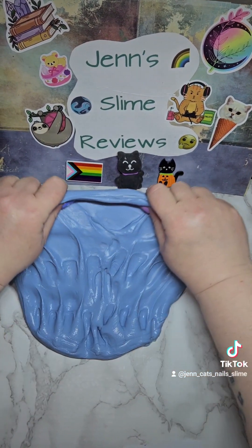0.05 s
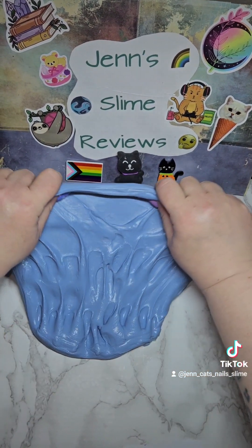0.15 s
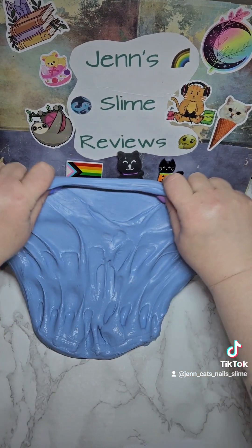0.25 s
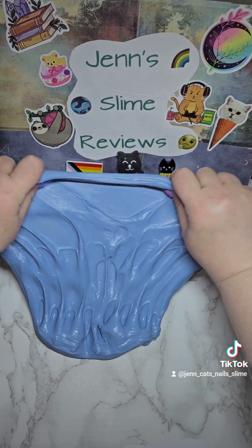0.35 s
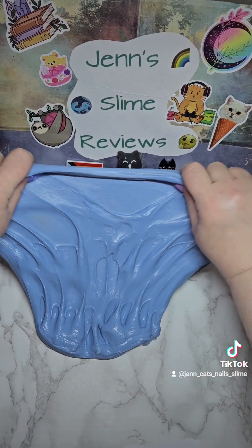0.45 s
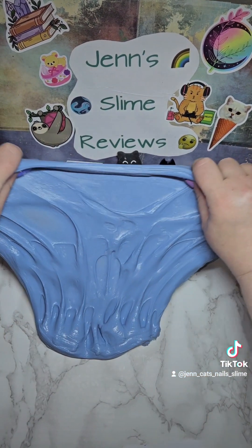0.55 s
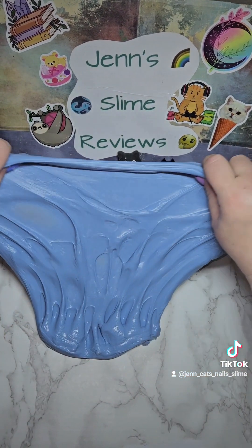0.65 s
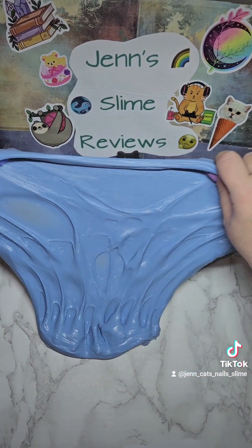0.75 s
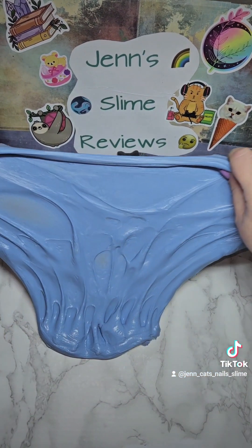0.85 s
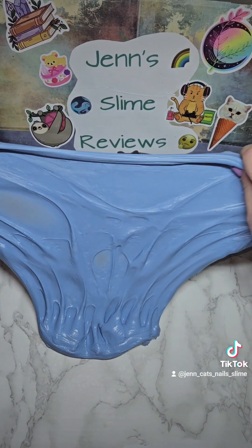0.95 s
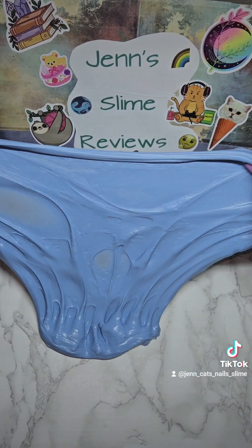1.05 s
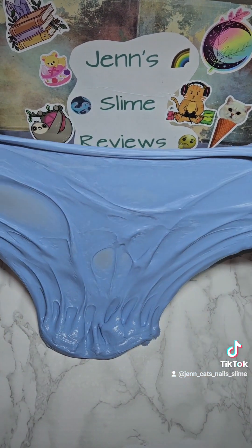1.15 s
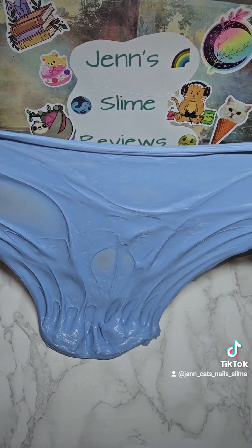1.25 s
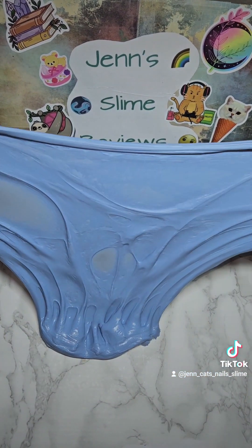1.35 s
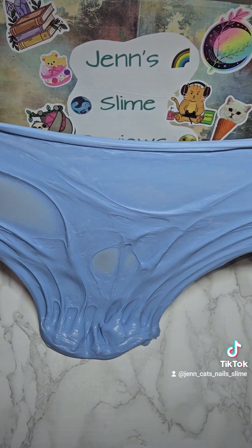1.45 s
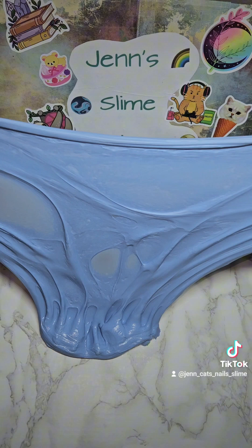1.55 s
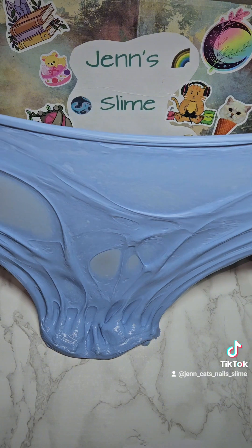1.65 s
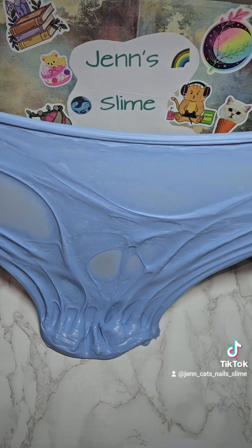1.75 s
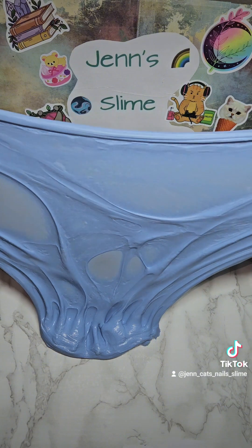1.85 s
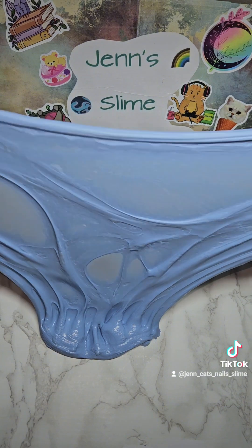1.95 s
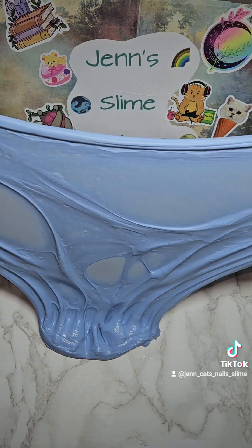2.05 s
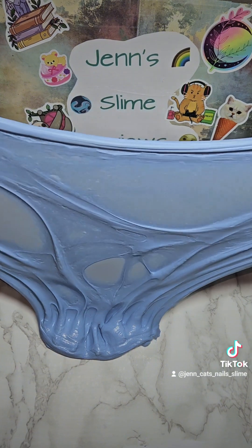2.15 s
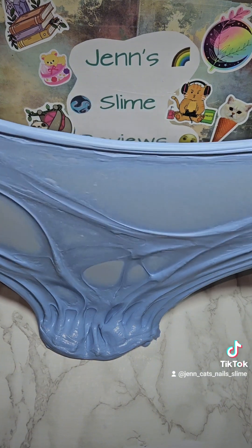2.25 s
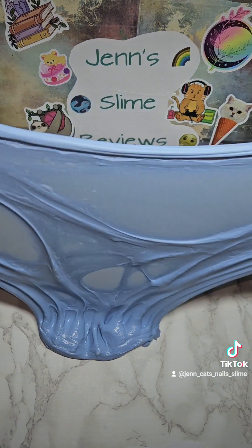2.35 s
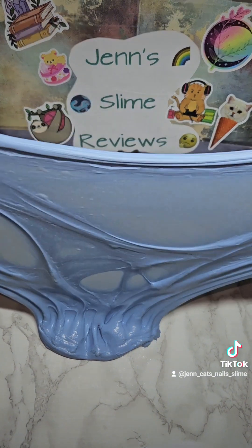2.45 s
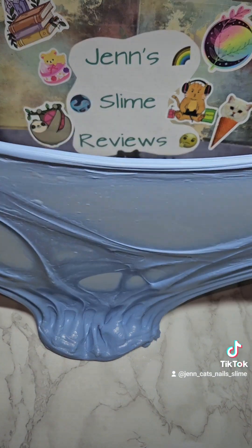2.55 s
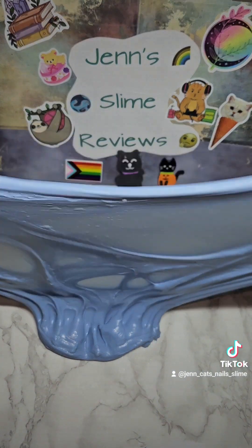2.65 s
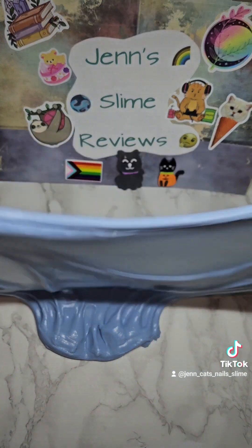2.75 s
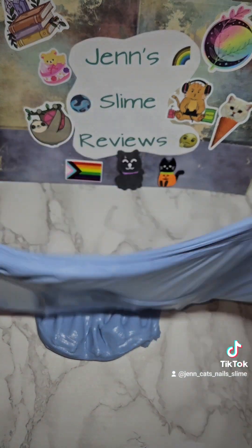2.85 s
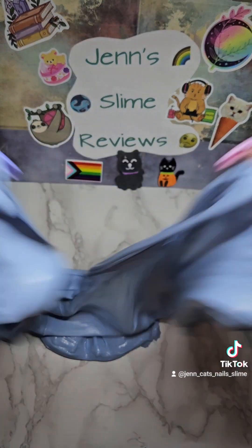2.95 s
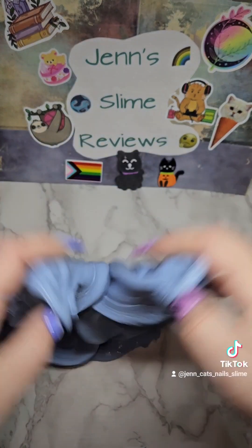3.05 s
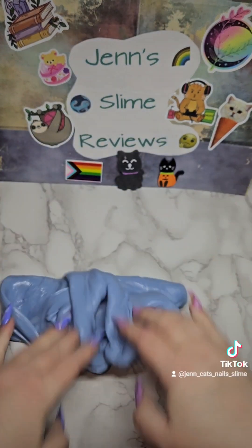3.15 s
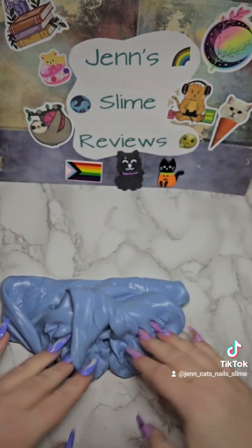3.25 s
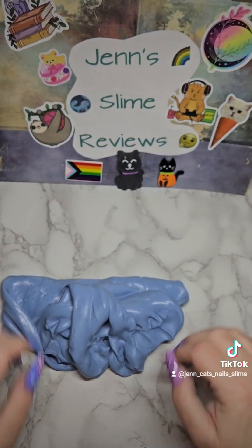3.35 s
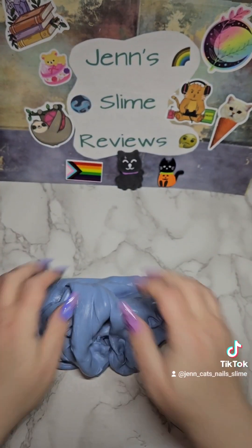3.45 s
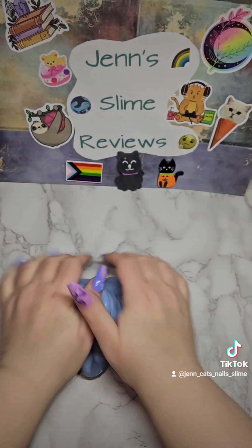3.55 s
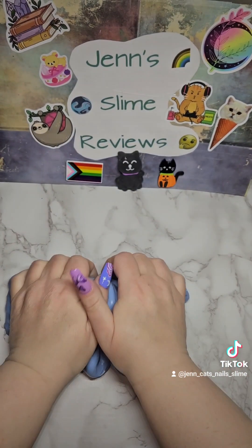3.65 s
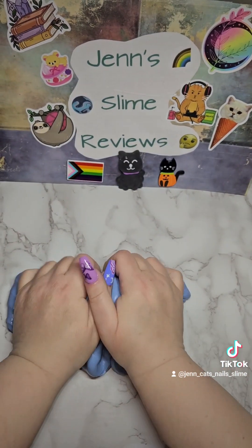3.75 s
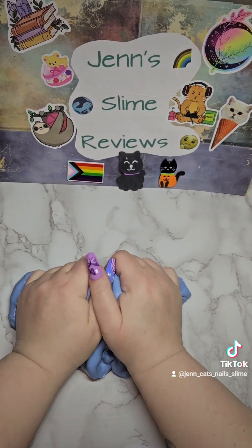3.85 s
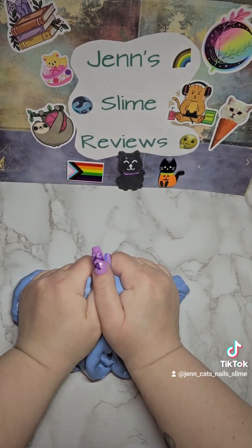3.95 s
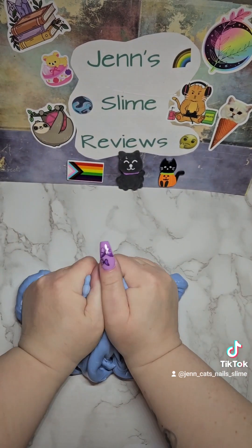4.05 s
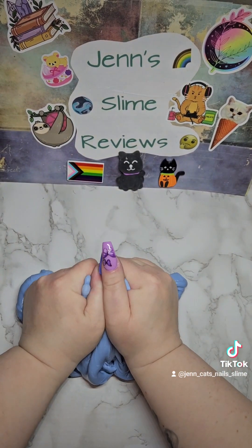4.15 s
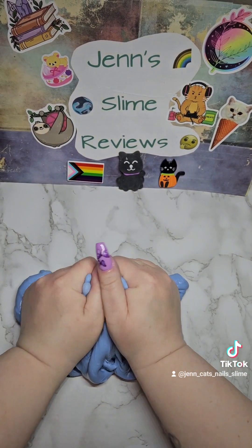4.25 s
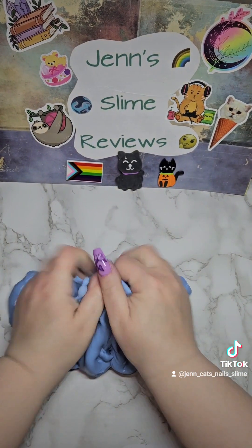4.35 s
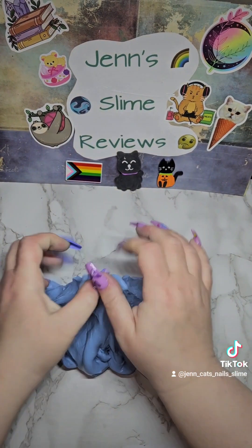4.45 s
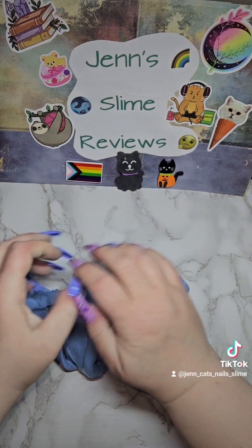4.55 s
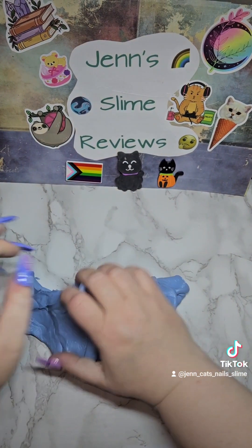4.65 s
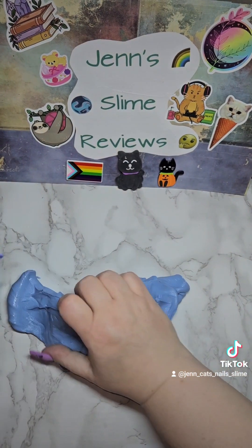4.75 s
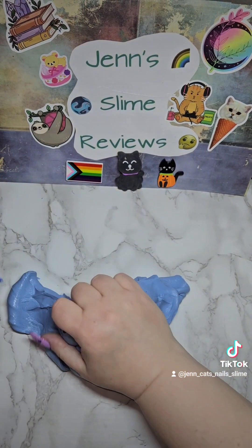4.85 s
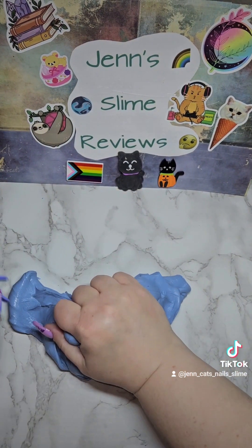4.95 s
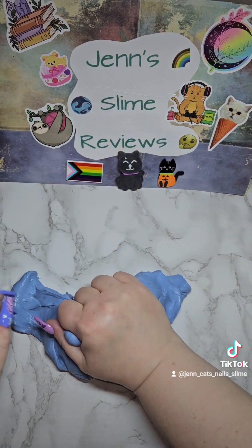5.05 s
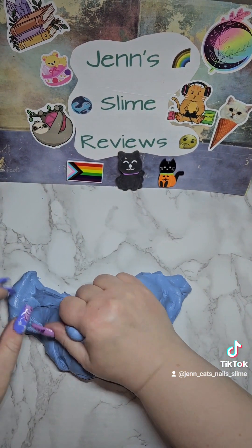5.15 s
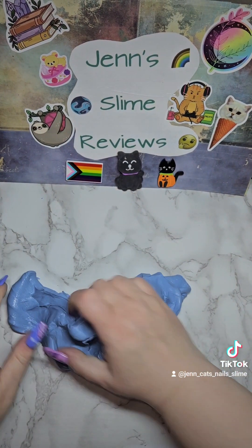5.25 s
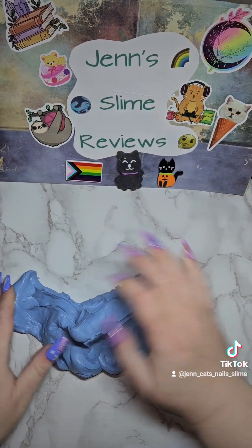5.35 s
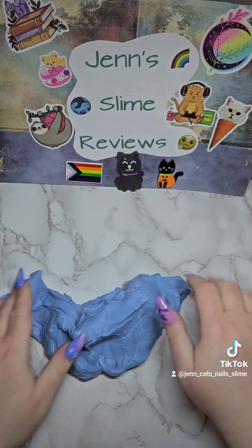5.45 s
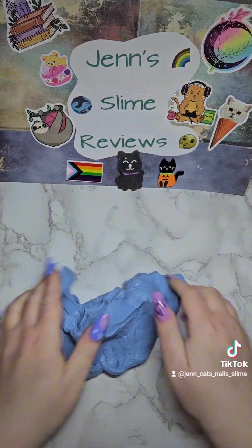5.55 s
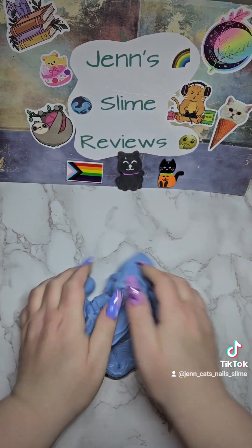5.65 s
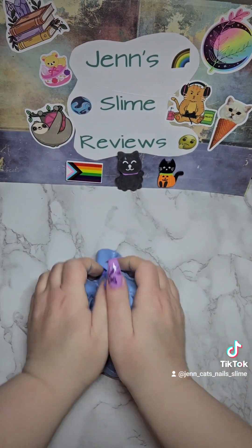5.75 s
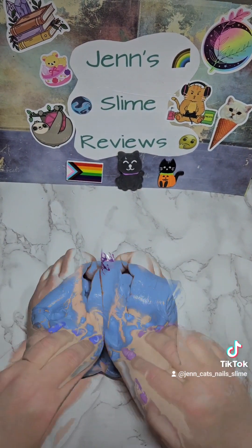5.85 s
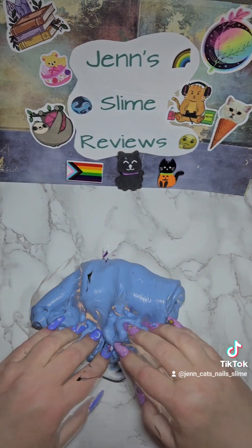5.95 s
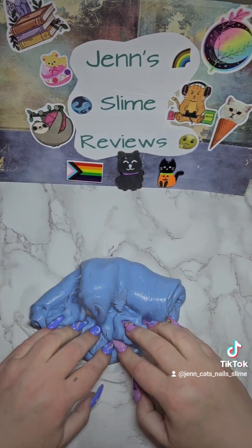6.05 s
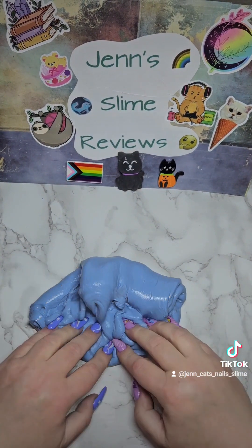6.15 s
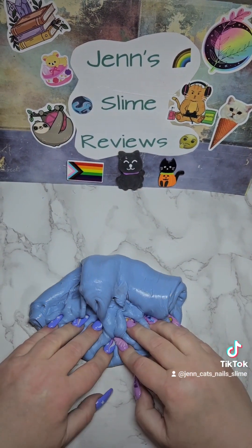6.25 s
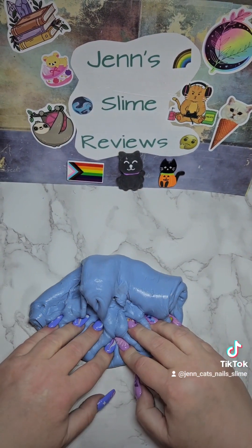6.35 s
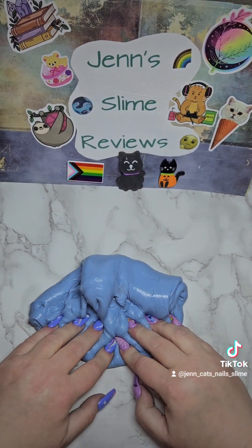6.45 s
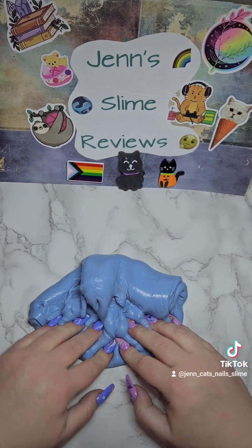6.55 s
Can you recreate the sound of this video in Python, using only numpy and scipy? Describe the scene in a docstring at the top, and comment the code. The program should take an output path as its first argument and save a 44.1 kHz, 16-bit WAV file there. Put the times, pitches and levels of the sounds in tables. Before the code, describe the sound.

Very close phone pickup of thick slime handled on a stone table in a small hard room, with a short bright reverb. At 0 s a crackle and soft low thud, then isolated pops and light bumps until 0.35. From 0.5 to 0.8 bubbles click rapidly, ending in loud wet snaps with husky gulps. From about 0.9 to 2.6 the stretching is nearly silent, with rare tiny ticks over a faint wavering fan hum that dips and rises. Crackling swells from 2.7 to 3.1 as the slime is folded. From 3.37 to 3.8 squeezing gives the densest, loudest pops, squelch and fizz, with a tiny squeak at 3.9. Quieter crackles lead to another sharp burst at 4.55-4.75. Sparser clicks follow, with a gulp near 5.3, strong pops at 5.65-5.85 and 6.05-6.2, a brief lull, and final soft sticky crackles around 6.5.

```python
"""In a small hard room, thick slime is stretched, folded and squeezed on a stone table close to a phone.
Air pockets pop as short damped rings with noisy snaps; tiny rings over noise make crackle, squelch and fizz.
Larger pockets gulp as husky tones, a slit squeaks, and low sagging tones with short slaps thud on the table.
Behind them lie a fan's wavering hum and air noise, turned slowly up and down by a drawn gain curve;
the phone limits the loudest peaks and narrows the band."""
import sys
import numpy as np
from scipy import signal
from scipy.fft import rfft, irfft, next_fast_len
from scipy.io import wavfile
from scipy.ndimage import uniform_filter1d, minimum_filter1d, map_coordinates

SR = 44100
rng = np.random.default_rng(int(sys.argv[2]) if len(sys.argv) > 2 else 0)


def int16_out(signal):
    """Quantize to a 16-bit WAV file."""
    q = np.round(np.clip(np.atleast_2d(signal).T, -1, 1) * 32767)
    wavfile.write(sys.argv[1], SR, q.astype(np.int16))


N = 290619

# squeezes, folds and pulls: (time [s], swell [s], hold [s], fade before each layer's stretch [s],
# crackle level [dB], small over large pockets [dB], squelch level [dB], fizz level [dB])
SQUEEZES = [(0.001, .01, .001, 0.019, -21, -14, -31, -34), (0.561, 0.17, 0.074, .008, -34.5, 0, -41.5, -39),
            (0.72, .003, 0.011, 0.12, -24, 0, -24.5, -41.5),
            (0.791, 0.0027, 0.0081, 0.13, -28, -6.5, -36, -62),
            (0.81, 0.027, .001, 0.035, -45.5, -13, -24, -68), (1.272, 0.17, .001, 0.48, -65, 14, -58, -69),
            (2.617, .008, 0.027, .1, -45, 4, -51, -45.5), (2.697, 0.11, 0.033, 0.08, -32, 0.5, -46.5, -32),
            (2.768, 0.045, 0.0086, 0.077, -34, -4, -43, -40.5),
            (2.863, 0.073, .001, 0.43, -32.5, -7, -39, -37.5),
            (2.997, 0.22, .001, 0.051, -25.5, -9, -33, -33.5),
            (3.026, .05, 0.076, 0.079, -36.5, -13, -36.5, -42.5),
            (3.187, 0.27, .001, 0.27, -44, -29, -38.5, -69),
            (3.254, 0.019, 0.00092, 0.27, -42.5, -13, -59, -49),
            (3.375, 0.005, .001, 0.18, -19.5, -3, -19, -34),
            (3.521, 0.14, 0.039, .1, -26.5, -0.5, -32, -29.5),
            (3.584, 0.054, .001, 0.16, -20.5, -8, -23.5, -31),
            (3.668, 0.0078, .001, 0.05, -16.5, 13, -26, -25),
            (3.743, 0.17, 0.0011, 0.17, -18.5, -7, -28.5, -30.5),
            (3.885, 0.058, 0.011, 0.03, -23, -17, -34.5, -44),
            (3.926, 0.014, 0.00089, 0.13, -37.5, 11, -40, -36),
            (4.102, 0.075, 0.1, 0.12, -31.5, -7, -36.5, -36.5),
            (4.326, 0.31, .001, 0.019, -43, -23, -37.5, -46),
            (4.394, 0.22, .001, 0.033, -43, -18, -46, -51.5),
            (4.449, .04, 0.00088, 0.086, -45, -8, -49, -65),
            (4.542, .012, .001, 0.15, -27, -6.5, -67, -41.5),
            (4.63, 0.067, 0.057, .03, -30.5, -4, -48, -46),
            (4.719, 0.03, 0.00092, 0.17, -18, 5, -36.5, -37),
            (4.989, 0.038, .001, 0.12, -34, -2, -47, -32.5),
            (5.093, 0.16, .001, 0.028, -25.5, -7, -35, -35.5),
            (5.205, 0.079, 0.05, 0.076, -38.5, -2, -56, -40),
            (5.291, 0.075, 0.11, 0.87, -40.5, -5.5, -40, -46),
            (5.511, 0.041, .001, 0.16, -36.5, -11, -56, -49),
            (5.684, 0.18, 0.00033, 0.17, -41, -13, -80, -42.5),
            (5.832, 0.013, .001, 0.21, -20, 2, -34, -39), (6.08, 0.046, 0.059, .1, -34.5, -4, -58, -35),
            (6.175, 0.15, .001, 0.13, -22, -8, -29, -31.5),
            (6.474, 0.083, 0.026, 0.08, -28.5, 0, -29, -35.5),
            (6.564, 0.065, .001, 0.062, -32.5, -2, -33.5, -31.5)]


def amp(db):
    """Decibels to gain."""
    return 10 ** (np.asarray(db) / 20)


def unit(x):
    """Scales a signal to rms 1."""
    return x / np.sqrt(np.mean(x ** 2) + 1e-20)


def along(points, hz):
    """Reads a curve of (frequency [Hz], value) points on a log frequency axis."""
    point_hz, value = np.transpose(points)
    return np.interp(np.log(hz + 1), np.log(point_hz + 1), value)


def curves(rows):
    """Draws one value per sample for each column after the time."""
    s, *columns = np.transpose(rows)
    t = np.arange(N) / SR
    return [np.interp(t, s, column) for column in columns]


def wobble(rate):
    """Draws a smooth random curve through `rate` knots a second."""
    knots = rng.standard_normal(int(N * rate / SR) + 4)
    return map_coordinates(knots, [np.arange(N) * rate / SR])


def filtered(x, response):
    """Multiplies the spectrum of x by a response of frequency in Hz."""
    size = next_fast_len(N + SR // 2)
    spectrum = rfft(x, size) * response(np.fft.rfftfreq(size, 1 / SR))
    return irfft(spectrum, size)[..., :N]


def place(s, rows):
    """Sums short sounds, one per row, at times s in seconds."""
    at = np.round(np.asarray(s) * SR).astype(int)[:, None] + np.arange(rows.shape[1])
    return np.bincount(at.ravel(), rows.ravel(), N + SR)[:N]


def pops():
    """Each pocket rings briefly as it bursts, its skin snaps and tears, and the surfaces reflect it."""
    # bursting air pockets: (time [s], peak level before reflection and bass loss [dB], pocket pitch [Hz],
    # ring t60 [ms], snap level before peak scaling [dB])
    pockets = [(0.0089, -10, 1690, 1.1, -7), (0.058, -18.5, 3430, 2.5, -7), (0.102, -24, 7600, 2.1, -7),
               (0.1627, -7, 6800, 1.4, -13), (0.1994, 0, 1080, 2.7, -30), (0.2979, -27, 4220, 1.4, -9),
               (0.5256, -18, 3870, 3.1, 0), (0.549, -12, 4060, 4.5, -7), (0.564, -13.5, 3590, 3.5, -19),
               (0.5787, -21, 3680, 2.7, -3), (0.585, -18, 3700, 4, -15), (0.599, -13, 3830, 5.7, -20),
               (0.625, -12, 3050, 3.7, -9), (0.6285, -4, 3530, 2.9, -12.5), (0.639, -12, 3680, 5.2, -11),
               (0.7202, 7, 1730, 4, -11.5), (0.7266, 2.5, 3150, 7.9, -15), (0.7927, 2, 1580, 2.7, -25),
               (0.803, -21, 3210, 13, -9), (1.0984, -42, 3570, 4.5, -15), (1.4838, -32.5, 10030, 2.7, -11),
               (1.9072, -37.5, 3500, 1.9, 8), (2.6982, -23, 4800, 6, -9), (2.7235, -14, 3400, 13, -5),
               (2.8302, -15, 6520, 5.2, 0), (2.8718, -6, 5470, 1.2, -24), (2.9174, -9, 5800, 3.5, -12),
               (2.9396, -7.5, 1550, 4.4, -2), (2.9529, -5.5, 1500, 5.3, -9), (2.9845, -13, 1380, 11, -21),
               (2.9943, -2.5, 1480, 2.4, -28), (3.1046, -19, 1580, 22, -19), (3.255, -21.5, 2580, 10, -12),
               (3.2951, -14.5, 5400, 3.4, -32), (3.375, 3, 4000, 7.5, -25), (3.3793, 0.5, 3880, 18, -29),
               (3.3886, 7, 3220, 14, -38), (3.4157, -9.5, 3330, 11, -5), (3.488, -4, 2710, 1.6, 3),
               (3.5175, 1.5, 3640, 5, -6), (3.552, 17.5, 2520, 3.3, -13), (3.562, -4, 5300, 10, -25.5),
               (3.583, -2, 2450, 4.3, -15), (3.6326, -1, 4760, 1.2, -13), (3.6643, 13.5, 2750, 3.5, -16),
               (3.6802, 4.5, 1600, 5, -9), (3.7166, 9, 4630, 1.6, -22), (3.7257, 1.5, 4850, 13, -17),
               (3.7306, 4.5, 5300, 1.2, -16), (3.741, -8, 4270, 5, -12), (3.7646, -2.5, 1460, 3.4, -10),
               (3.775, 2, 2940, 1.8, -11.5), (3.847, -21, 3140, 3.3, 6), (3.8692, -3.5, 1490, 8.5, -20),
               (3.9285, -3.5, 5840, 4.6, -6), (4.105, -18, 3140, 13, -12.5), (4.143, -14.5, 1440, 8.5, -6),
               (4.153, -14, 2930, 10, -10), (4.1699, -8.5, 1590, 13, -1), (4.182, -14, 1500, 11, 0),
               (4.213, -25, 2300, 9, -2), (4.2432, -15, 13350, 2.4, -8), (4.2736, -15.5, 3670, 4.1, 10),
               (4.3106, -19, 2630, 7.9, -18), (4.384, -22, 14200, 4.4, 4), (4.541, -8, 1860, 29, 2),
               (4.563, 5, 3920, 7.9, 5), (4.601, -20, 2450, 3.5, -26), (4.6144, 0, 2590, 4.9, -13),
               (4.618, 6.5, 4740, 1.5, -36), (4.6316, -2, 4870, 3.5, -34), (4.64, -2, 3870, 3, -39),
               (4.672, -16, 6560, 4.8, -21), (4.6902, 9, 4940, 5.2, -27), (4.705, 2.5, 3460, 4, -17),
               (4.7199, -7.5, 4900, 3.3, 0), (4.8286, -15.5, 11420, 2.3, -10), (5.0298, 4.5, 1550, 3, -9),
               (5.0872, -14, 1690, 19, -20), (5.1683, -15, 2900, 1.8, -9.5), (5.211, -9, 7450, 2.8, -11),
               (5.2137, -14.5, 2380, 4.7, 4), (5.3053, -12.5, 1710, 2, -25), (5.4287, -10, 4440, 1.9, -9.5),
               (5.459, -25, 4500, 2.6, 0), (5.502, -12, 2705, 3.2, -20), (5.515, -11.5, 2100, 3, -3),
               (5.5451, -9, 9500, 0.56, -20), (5.5773, -8.5, 2130, 6.7, -9.5),
               (5.6174, -12, 10400, 2.5, -13), (5.6434, -11, 2200, 5, -5), (5.657, -10, 7500, 3.4, -30),
               (5.668, 4, 2740, 3.4, 2), (5.6729, -5.5, 3270, 3.1, -46), (5.6803, -14, 3380, 6.8, -20),
               (5.699, -10, 5300, 6.1, -1), (5.7725, -23.5, 5400, 4.3, -3), (5.7852, -24, 2900, 5.2, -19),
               (5.8192, -8, 2540, 1.9, 1), (5.8275, 5, 2830, 2.4, -24), (5.8357, -3, 3870, 4.7, -22),
               (5.855, -4.5, 3530, 3.3, 1), (5.8876, -7.5, 9400, 2.4, -10),
               (5.9224, -10.5, 12730, 3.5, -2.5), (5.9716, -5.5, 13300, 1.4, -30),
               (6.0649, -2.5, 1876, 5, 10), (6.1239, 0, 5280, 8.4, 8), (6.1415, -4.5, 3060, 2.1, -17),
               (6.159, -3, 2730, 1.5, -26), (6.1862, 1.5, 2570, 2.9, -32), (6.209, -12.5, 3300, 5.6, -10),
               (6.469, -19, 4250, 8, -8), (6.479, -11, 3920, 10, -7), (6.488, -11.5, 3100, 12, -10),
               (6.4962, -16, 3600, 7.3, -10)]
    # reflections off table and hands: (delay [s], level [dB])
    reflections = [(.0014, -17.5)]
    s, db, hz, ring_ms, snap_db = np.transpose(pockets)[:, :, None]
    t = np.arange(700) / SR
    noise = rng.standard_normal((len(pockets), len(t)))

    # the opening mouth shifts the pitch at random
    bend = 1 + .005 * np.cumsum(noise, 1)
    turn = 2 * np.pi * np.cumsum(hz * bend, 1) / SR
    fade = amp(-60 * t / (ring_ms / 1000))
    # the first swing is the strongest and holds the side modes of an uneven pocket
    first = fade ** 3
    main_mode = np.sin(turn) * (0.6 * fade + 1.24 * first)
    side_modes = (0.11 * np.sin(0.3 * turn) + 0.75 * np.sin(1.693 * turn)) * first

    snap = np.sqrt(2) * uniform_filter1d(noise, size=2) * amp(snap_db - 60 * t / 0.0045)
    # the torn skin slackens: a duller noise
    tear = uniform_filter1d(noise, size=5) * amp(-23.5 - 60 * t / 0.0057)
    onset = 1 - np.exp(-t * hz / 0.43)
    burst = (main_mode + side_modes + snap + tear) * onset
    direct = place(s[:, 0], amp(db) * burst / np.abs(burst).max(1, keepdims=True))

    reflected = sum(amp(level) * np.roll(direct, round(delay * SR)) for delay, level in reflections)
    # small pockets send out little bass
    return filtered(direct + reflected, lambda f: (1j * f / (260 + 1j * f)) ** 2)


def kneading():
    """The skin crackles, the wet body squelches, the finest bubbles fizz; all clump together."""
    # relative power density of each layer: (frequency [Hz], level [dB per Hz])
    crackle_color, squelch_color, fizz_color = [(410, -46), (700, -14), (886, -11), (1580, 2), (1810, -1.5),
                                                (2690, 3), (4260, 2.5), (4840, 5), (6600, -9),
                                                (9000, -21.5), (11700, -27.5), (19800, -120)], [(90, -41), (190, -11), (300, -0.5),
                                                                 (450, 0), (700, -2.5), (1100, -4.5),
                                                                 (1800, -7), (2600, -28), (4000, -120)], [(3000, -31.5), (6000, 2),
                                                                                  (9500, 0.5),
                                                                                  (13000, -1.5),
                                                                                  (16500, -3.5)]
    # the slime creeping between squeezes: (time [s], crackle level [dB], squelch level [dB], fizz level [dB])
    creep = [(0, -55.5, -61, -55.5), (.5, -55, -65, -57), (.66, -68, -46.5, -56), (.91, -66, -60.5, -71.5),
             (1.2, -72, -58, -69), (1.89, -75, -67, -69), (2.0, -72, -57, -69), (2.61, -61, -51, -62.5),
             (3.3, -60, -42.5, -63), (4.0, -63, -54, -69), (4.5, -72, -56.5, -64), (5.0, -67, -53, -67),
             (5.7, -51, -52, -58), (6.3, -52, -44.5, -64)]
    clumps_db = 2.8  # how unevenly the small pockets give way
    split_hz = 2660  # pockets above this pitch count as small
    # stretch of the table's fade time, per layer
    large_lasts, small_lasts, squelch_lasts, fizz_lasts = 0.84, 0.71, 0.84, 0.75

    crackle_db, small_db, squelch_db, fizz_db = np.transpose(SQUEEZES)[4:]
    creep_crackle_db, creep_squelch_db, creep_fizz_db = curves(creep)
    # the crackle level is the mean power of large and small pockets
    large_db = crackle_db - 10 * np.log10((1 + amp(small_db) ** 2) / 2)

    crackle = grains(crackle_color, count=14000, size=300, cycles=2.5, spread_db=2.9, noise_share=.35)
    large = filtered(crackle, lambda hz: 1 / (1 + (hz / split_hz) ** 6))
    small = crackle - large
    skin = effort(large_db, large_lasts, creep_crackle_db) * large
    skin = skin + effort(large_db + small_db, small_lasts, creep_crackle_db) * small

    squelch = grains(squelch_color, count=4500, size=800, cycles=1.5, spread_db=2.4, noise_share=.5)
    squelch = effort(squelch_db, squelch_lasts, creep_squelch_db) * squelch
    fizz = grains(fizz_color, count=9000, size=60, cycles=.8, spread_db=2.6, noise_share=.6)
    fizz = effort(fizz_db, fizz_lasts, creep_fizz_db) * fizz

    clumps = amp(clumps_db * wobble(70))
    # the wet body clumps half as deeply in decibels
    return clumps * (skin + fizz) + np.sqrt(clumps) * squelch


def grains(spectrum, count, size, cycles, spread_db, noise_share):
    """Tiny damped pockets ring at random times over noise, coloured together; rms 1."""
    when, pitch, rarity = rng.random((count, 3)).T[:, :, None]
    low_hz, high_hz = spectrum[0][0], spectrum[-1][0]
    hz = low_hz * (high_hz / low_hz) ** pitch
    t = np.arange(size) / SR
    rings = np.sqrt(hz) * np.sin(2 * np.pi * hz * t) * np.exp(-t * hz / cycles)
    onset = 1 - np.exp(-4 * t * hz / cycles)
    # many weak pockets, few strong ones, none huge
    strength = amp(-spread_db * np.log(1 - .99 * rarity))
    ticks = place(when[:, 0] * N / SR, rings * onset * strength)
    # the tilt whitens pitches drawn evenly per octave
    ticks = filtered(ticks, lambda f: np.sqrt(f))
    noise = rng.standard_normal(N)
    mix = np.sqrt(1 - noise_share) * unit(ticks) + np.sqrt(noise_share) * noise
    return unit(filtered(mix, lambda f: amp(along(spectrum, f))))


def effort(peak_db, lasts, rest_db):
    """Gain of one layer: every squeeze swells, holds and fades evenly in decibels; powers add to the creep."""
    span_db = 30  # what a swell gains and a fade loses
    t = np.arange(0, N / SR + .002, .001)  # 1 ms steps
    s, swell, hold, fade = np.transpose(SQUEEZES)[:4, :, None]
    before = np.maximum(s - t, 0) / swell
    after = np.maximum(t - s - hold, 0) / (fade * lasts)
    power = np.sum(amp(peak_db[:, None] - span_db * (before + after)) ** 2, axis=0)
    return np.sqrt(np.interp(np.arange(N) / SR, t, power) + amp(rest_db) ** 2)


def gulps():
    """A larger wet, hollow pocket opens slowly enough to ring as one husky tone."""
    # gulping pockets: (time [s], peak level [dB], pitch before the glide [Hz], t60 [s])
    hollows = [(0.012, -16, 665, 0.018), (0.7197, -1, 3110, 0.01), (0.733, -16, 2990, 0.11),
               (0.767, -19, 3060, 0.13), (0.7915, -7.5, 3120, 0.0088), (2.951, -22.5, 455, 0.061),
               (2.994, -14.5, 3440, 0.0091), (3.008, -20, 2450, 0.024), (3.092, -31, 714, .03),
               (3.112, -23, 1903, 0.025), (3.172, -25, 1760, 0.043), (3.179, -33, 2190, 0.026),
               (3.19, -32, 1515, 0.045), (3.279, -30, 2450, .025), (3.375, -8.5, 2840, 0.03),
               (3.389, -14, 952, 0.042), (3.394, -16.5, 1283, 0.14), (3.416, -18, 922, 0.058),
               (3.441, -27, 936, 0.05), (5.033, -12.5, 2950, 0.01), (5.3068, -13.5, 602, 0.015),
               (5.322, -27.5, 592, 1.2), (6.075, -27, 2020, 0.014), (6.367, -30, 1805, 0.045),
               (6.504, -23, 480, .04), (6.562, -30, 1970, 0.034)]
    start_s, glide = 0.00082, -0.025  # soft start; share of pitch gained, most of it within 10 ms
    gurgle_db = 4  # rms unevenness of the tone, growing as it dies
    rough = .09  # random walk of the phase [radians a sample at 1 kHz]
    s, db, hz, t60 = np.transpose(hollows)[:, :, None]
    t = np.arange(11000) / SR
    settling = np.tanh(100 * t)
    turn = 2 * np.pi * np.cumsum(hz * (1 + glide * settling), 1) / SR
    turn = turn + rough * np.sqrt(hz / 1000) * np.cumsum(rng.standard_normal(turn.shape), 1)
    tone = np.sin(turn) * amp(-60 * t / t60) * (1 - np.exp(-t / start_s)) ** 2
    gurgle = unit(uniform_filter1d(rng.standard_normal(turn.shape), size=130))
    closing = np.cos(np.pi / 2 * t / t[-1])  # brings long rings to silence
    tone = tone * amp(gurgle_db * gurgle * settling) * closing
    return place(s[:, 0], amp(db) * tone / np.abs(tone).max(1, keepdims=True))


def squeak():
    """Air squeezed through a slit: a gliding tone, richer in overtones at low pitch, where the slit is slack."""
    # the glide: (time [s], pitch [Hz], fundamental level [dB])
    slit = [(3.88, 1707, -43), (3.886, 1356, -13), (3.89, 868, -23.5), (3.895, 690, -22), (3.9, 1170, -22),
            (3.904, 1400, -17), (3.908, 1390, -18), (3.913, 1403, -50)]
    hz, db = curves(slit)
    turn = 2 * np.pi * np.cumsum(hz) / SR
    slack = np.clip((1250 - hz) / 450, 0, 1)
    overtones = 1.4 * np.sin(2 * turn) + 0.5 * np.sin(3 * turn) + 0.43 * np.sin(4 * turn)
    sounding = db > db[0]  # silent outside the glide
    return (np.sin(turn) + slack * overtones) * amp(db) * sounding


def thuds():
    """Hands and lump meet the table: a short slap with a soft low push whose pitch sags as it dies."""
    # impacts: (time [s], level [dB], pitch after the sag [Hz], push t60 [s], slap over push [dB])
    impacts = [(0.011, -11.5, 112, 0.1, -30), (0.198, -26, 82.5, 0.13, -11), (0.236, -7, 83, 0.0054, -13.5),
               (0.318, -3, 105, 0.0057, -8.5), (0.482, -20.5, 87.6, 0.036, -3),
               (0.7422, -11.5, 248, 0.023, 2), (0.797, -20, 350, 0.029, -8), (0.8084, -9.5, 289, 0.017, 2),
               (2.994, -15.5, 320, 0.042, 13), (3.389, -15, 412, 0.12, 12), (3.581, -13.5, 480, 0.027, -17),
               (6.169, -24, 517, 0.062, 6), (6.504, -22, 313, 0.15, -18)]
    s, db, hz, t60, slap_db = np.transpose(impacts)[:, :, None]
    t = np.arange(4000) / SR
    sagging_hz = hz + 70 * np.exp(-t / 0.0033)
    onset = 1 - np.exp(-t / 0.00039)
    push = -np.sin(2 * np.pi * np.cumsum(sagging_hz, 1) / SR) * amp(-60 * t / t60) * onset
    slap = -np.sin(2 * np.pi * 700 * t) * amp(slap_db - 60 * t / 0.0038)
    return place(s[:, 0], amp(db) * (push + slap))


def room(x):
    """Reverb whose frequencies each die at their own speed; a new noise tail for every quarter second."""
    # decay of the small hard room: (frequency [Hz], t60 [s])
    decay = [(200, 0.19), (1000, 0.19), (4000, 0.23), (12000, 0.18)]
    stretch, delay = SR // 4, 130  # samples; the tail starts about 3 ms late
    out = np.zeros(N + SR)
    for at in range(0, N, stretch):
        hz, t, z = signal.stft(rng.standard_normal(SR // 2), SR, nperseg=256)
        fading = z * amp(-60 * t / along(decay, hz)[:, None])
        tail = signal.istft(fading, SR, nperseg=256)[1]
        wet = signal.fftconvolve(x[at:at + stretch], tail / np.linalg.norm(tail))
        out[at + delay:][:len(wet)] += wet
    return out[:N]


def fan():
    """A hum wavering in pitch and level, with air noise; one drawn gain curve turns both up and down."""
    # fan hum and air noise, turned slowly up and down as by the phone's automatic gain:
    # (time [s], hum level before wavering [dB])
    background_gain = [(0.0, -42.5), (1.3, -57.5), (2.55, -48.5), (3.41, -50.5), (6.04, -58), (6.29, -52),
                       (6.59, -52)]
    # relative spectrum of the room's air: (frequency [Hz], level [dB])
    air_color = [(15, -49.5), (25, -26), (65, -6.5), (103, -8.5), (150, -7), (389, -12), (445, -8.5),
                 (538, -12.5), (1470, -22), (2670, -30), (2980, -29.5), (11300, -45.5), (15200, -40),
                 (16500, -63)]
    hum_hz = 58.2 + 0.74 * wobble(9.5)
    hum = np.sqrt(2) * np.sin(2 * np.pi * np.cumsum(hum_hz) / SR) * amp(1.2 * wobble(9.1))
    air = unit(filtered(rng.standard_normal(N), lambda hz: amp(along(air_color, hz))))
    air = amp(1.5 + wobble(2.9)) * air
    gain_db, = curves(background_gain)
    return amp(gain_db) * (hum + air)


def scene():
    """Mixes slime near the phone, its reverb in the room, the table thuds and the fan."""
    bursts = pops()
    rubbing = kneading() + squeak() + gulps()
    wet = room(amp(-20.0) * bursts + amp(-14.0) * rubbing)
    return (bursts + rubbing + thuds() + wet + fan())[None]


def record(dry):
    """A look-ahead limiter ducks everything around loud peaks, then the microphone narrows the band."""
    # the phone's microphone: (frequency [Hz], gain [dB])
    mic = [(20, -14), (45, 0), (15300, 0), (15900, -14), (17000, -18)]
    ceiling, top_hz = .86, 17000  # limiter's peak level before the filter; band limit [Hz]
    need = np.minimum(1, ceiling / (np.abs(dry) + 1e-9))
    # hold the lowest gain, mostly ahead of the peak, then smooth it
    held = minimum_filter1d(need, size=601, origin=-120)
    gain = uniform_filter1d(held, size=331)
    return filtered(dry * gain, lambda hz: amp(along(mic, hz)) * (hz < top_hz))


dry = scene()
out = record(dry)
int16_out(out)
```